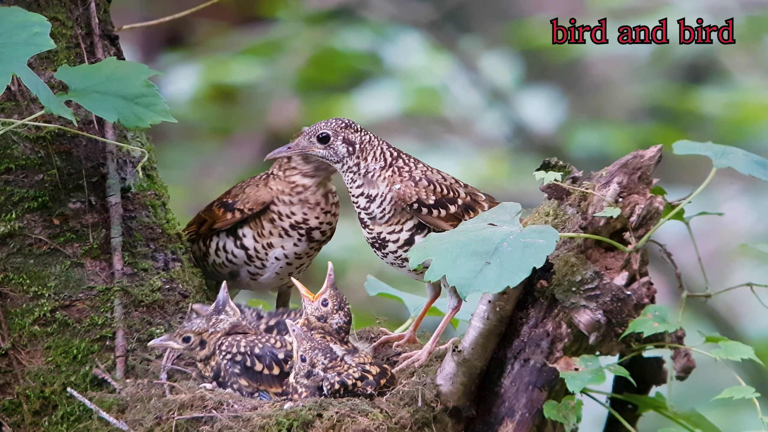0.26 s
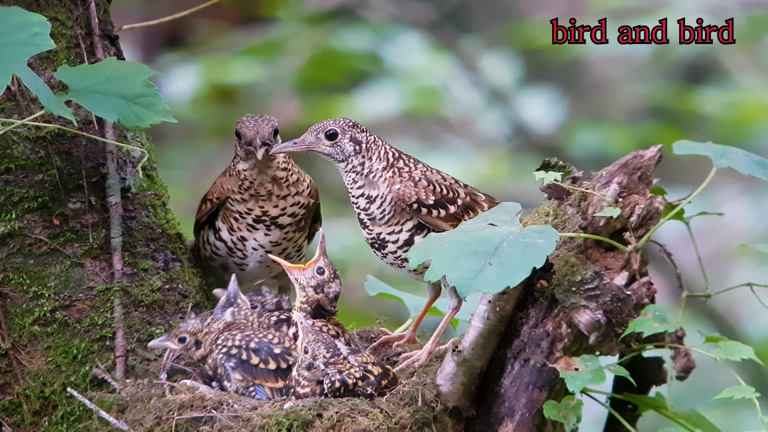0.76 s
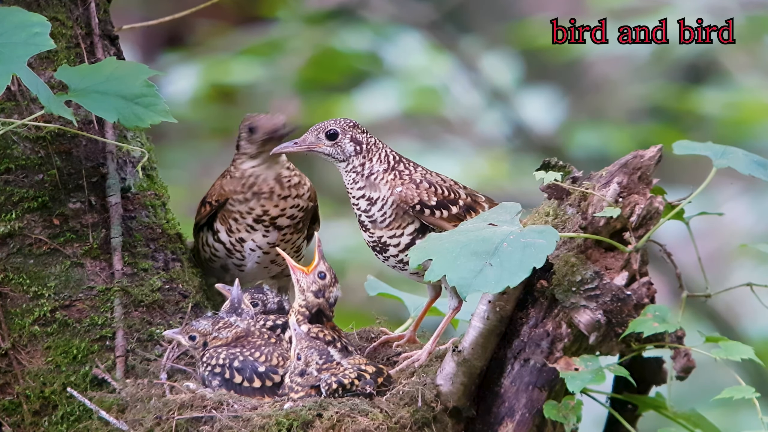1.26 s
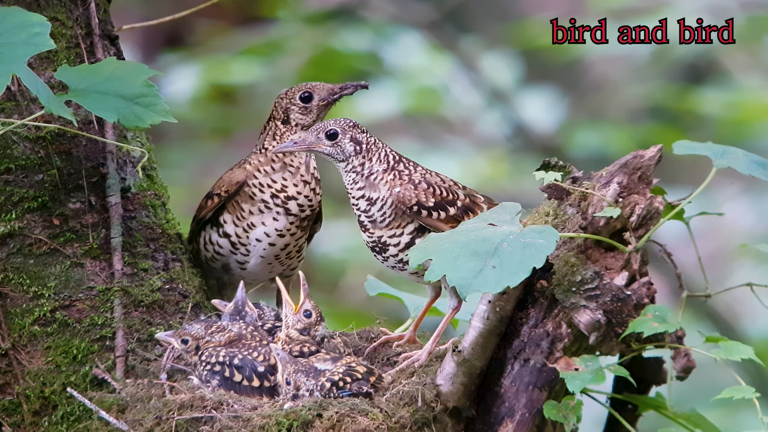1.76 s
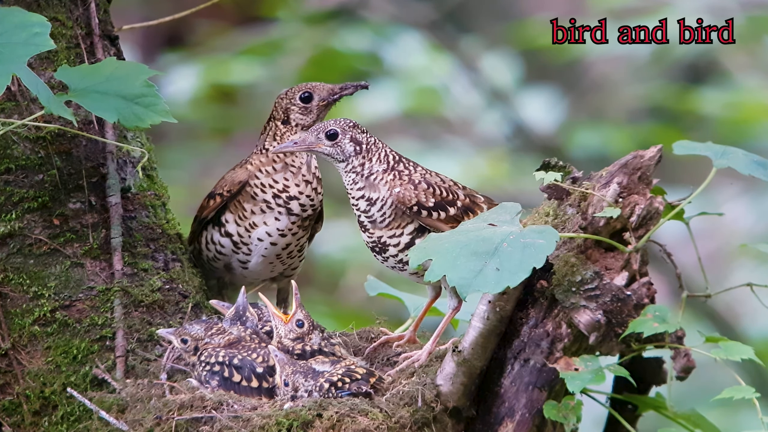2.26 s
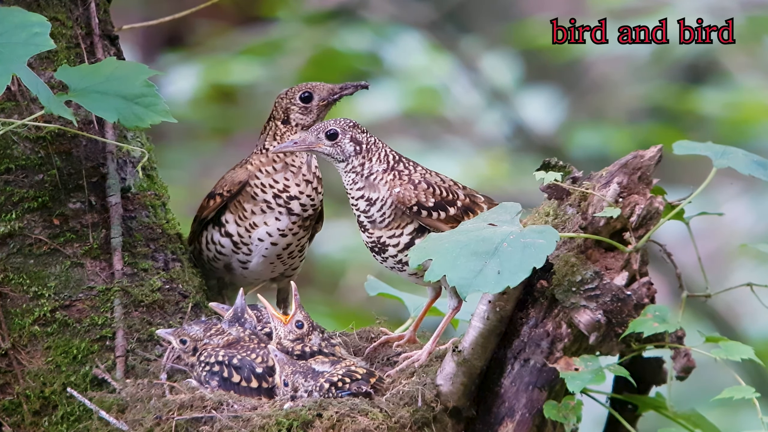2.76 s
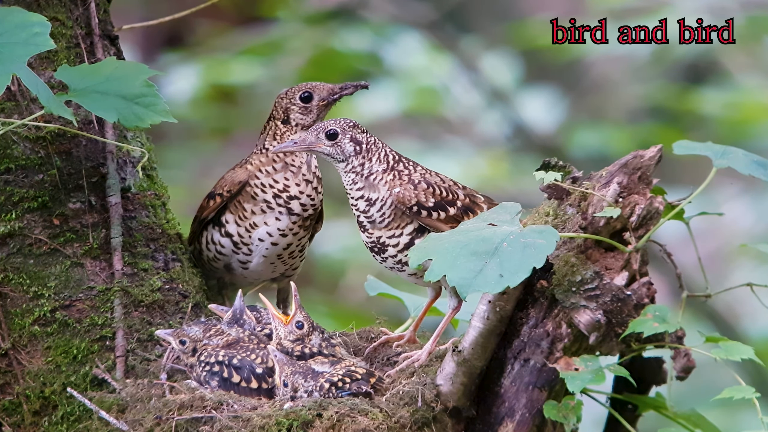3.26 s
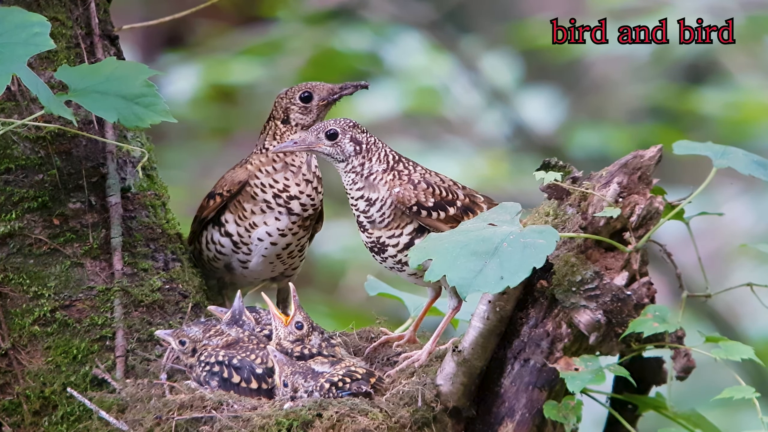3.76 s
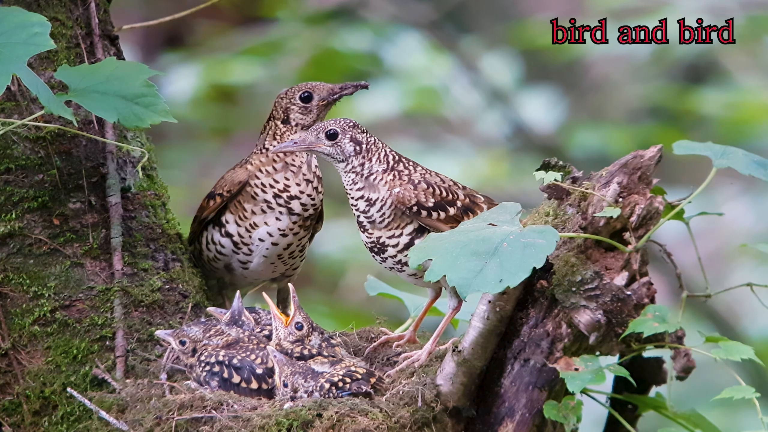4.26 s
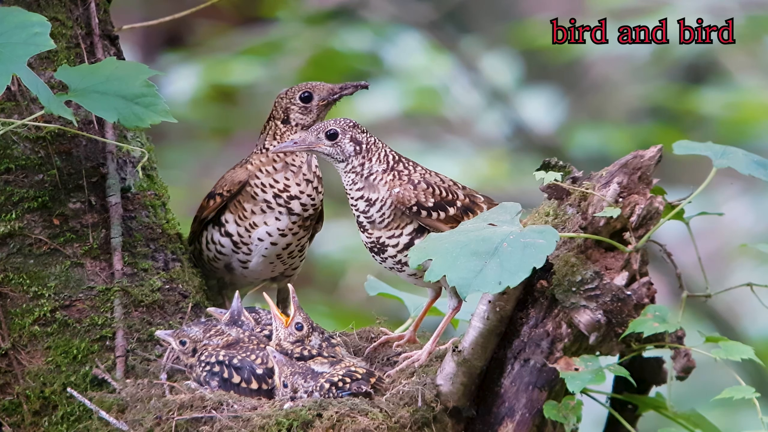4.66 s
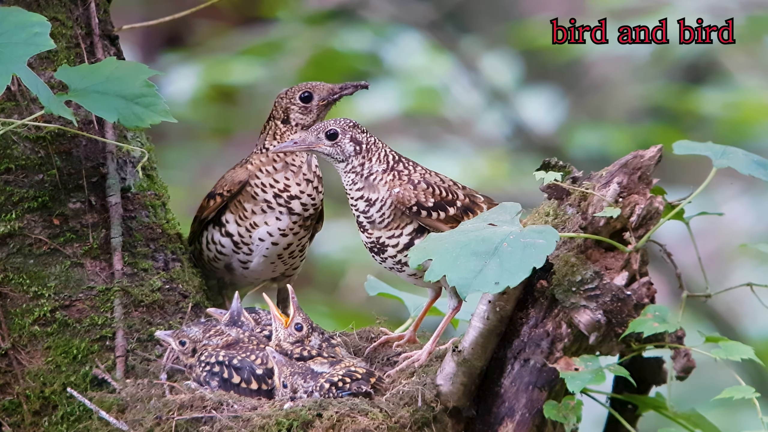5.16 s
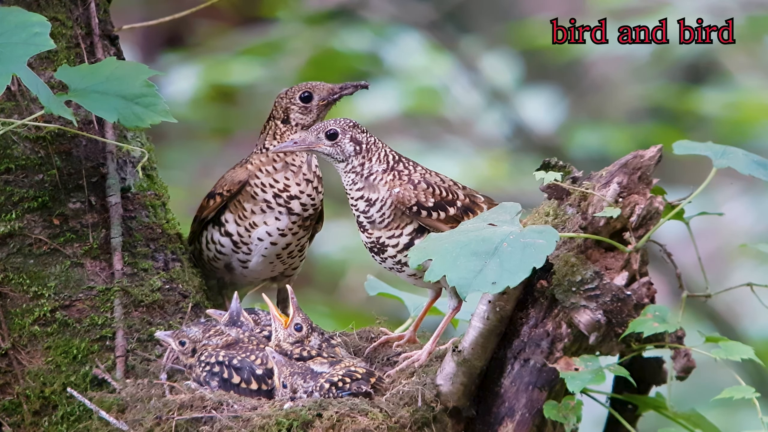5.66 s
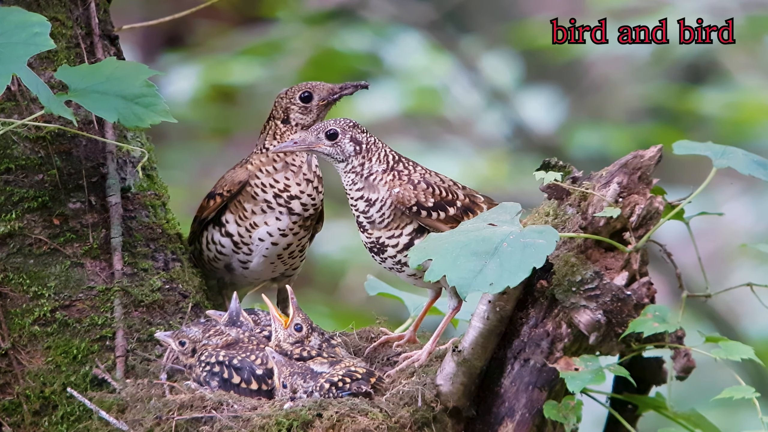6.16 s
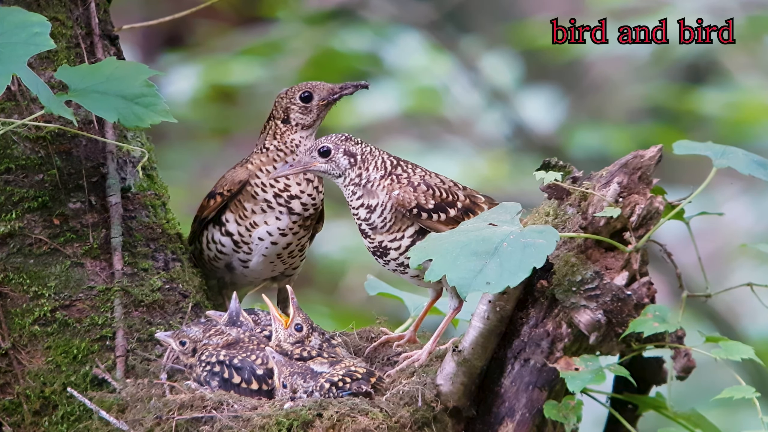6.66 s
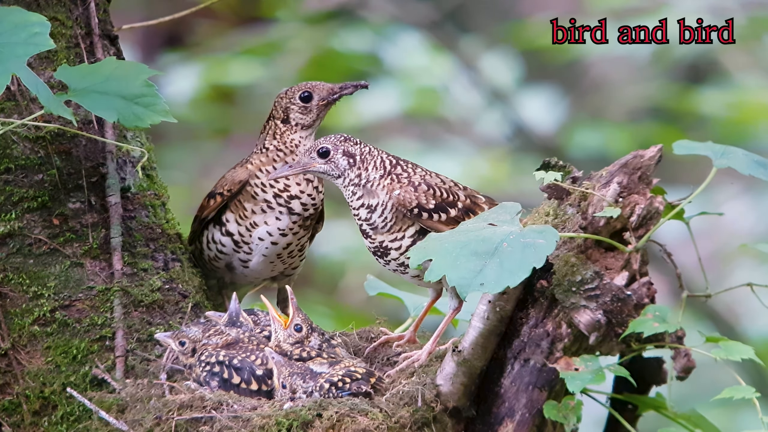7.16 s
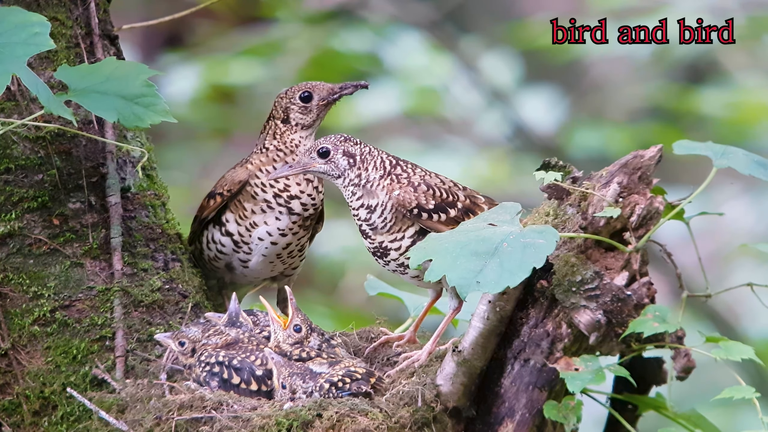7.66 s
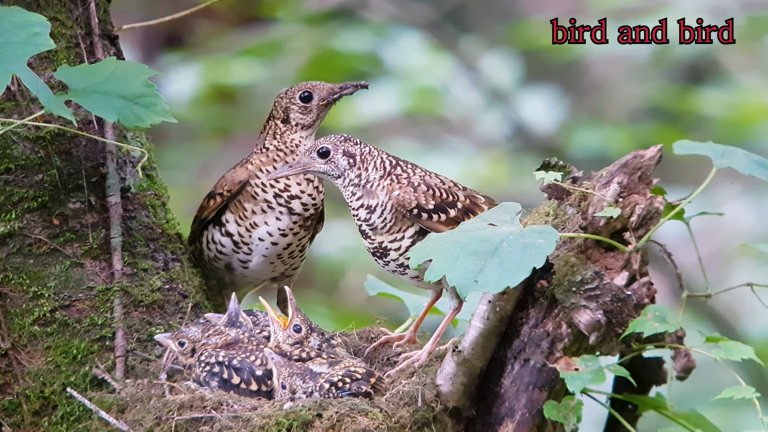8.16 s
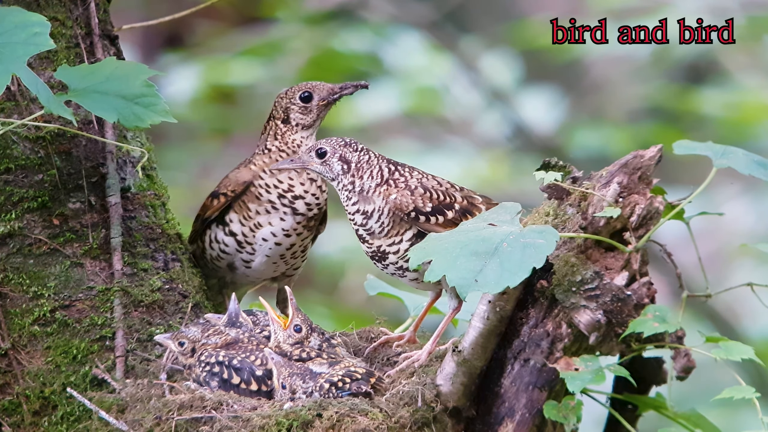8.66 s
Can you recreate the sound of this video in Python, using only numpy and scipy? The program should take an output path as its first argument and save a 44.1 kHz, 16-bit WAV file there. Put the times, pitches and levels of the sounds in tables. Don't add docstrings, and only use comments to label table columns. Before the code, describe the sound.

A quiet wide forest ambience: constant airy hiss, shimmering insects, and a raspy high cicada to the right that swells, cuts off sharply and returns. A pure, unbroken bird whistle of about half a second rings out with a lingering echo. Distant birds then exchange brief glides and burry chirps, with tiny rising calls. A second, marginally higher whistle follows, then the low-and-bright duet returns near the end.

```python
import sys
import numpy as np
from scipy import signal
from scipy.io import wavfile
from scipy.ndimage import uniform_filter1d

SR = 44100
rng = np.random.default_rng(int(sys.argv[2]) if len(sys.argv) > 2 else 0)


def file_out(sig):
    cols = np.atleast_2d(sig).T
    lim = np.clip(cols, -1, 1)
    pcm = np.round(lim * 32767).astype(np.int16)
    wavfile.write(sys.argv[1], SR, pcm)


def elevation(decibels):
    levels = np.asarray(decibels, float)
    return 10 ** (levels / 20)


N = 392490


def evened(x):
    return x / np.sqrt(np.mean(x ** 2) + 1e-20)


def read(points, hz):
    f, value = np.transpose(points)
    return np.interp(np.log(hz + 1), np.log(f + 1), value)


def curves(rows, t):
    s, *columns = np.transpose(rows)
    return [np.interp(t, s, c) for c in columns]


def panned(x, pan_db):
    side = np.array([elevation(pan_db / 2) * x, elevation(-pan_db / 2) * x])
    return side / np.sqrt((elevation(pan_db) + elevation(-pan_db)) / 2)


def add(mix, s, sound):
    part = mix[:, round(s * SR):][:, :sound.shape[1]]
    part += sound[:, :part.shape[1]]


def resonate(x, hz, width):
    turn = np.exp(2j * np.pi * np.cumsum(hz * np.ones(x.shape[-1])) / SR)
    r = np.exp(-np.pi * width / SR)
    return 2 * (turn * signal.lfilter([1 - r], [1, -r], x / turn)).real


def drift(top_hz, count):
    return evened(signal.lfilter(*signal.butter(2, 2 * top_hz / SR), rng.standard_normal(count)))


def trees(x, t60, delay):
    taps = np.zeros((2, 2 * SR))
    at = np.arange(0, 2 * SR - 40, 40) + rng.integers(0, 40, (2, (2 * SR - 1) // 40))
    np.put_along_axis(taps, at, rng.choice([-1., 1.], at.shape), 1)
    t = np.arange(2 * SR) / SR
    taps *= elevation(-60 * t / t60) * (1 - np.exp(-t / delay))
    return signal.fftconvolve(x, taps / np.linalg.norm(taps[0]), axes=1)[:, :N]


def thrush():
    # time in seconds, level in dB, pitch in Hz,
    # head turn as left minus right in dB.
    whistles = [
        [(1.44, -70, 2366, 0), (1.55, -52.5, 2311, -7), (1.61, -41, 2332, 7), (1.78, -34, 2357, 5.5),
         (1.83, -34.5, 2349, 5.5), (1.97, -41, 2330, 12), (2.025, -40, 2341, 1), (2.07, -40.5, 2340, 10),
         (2.095, -56, 2326, 6)],
        [(6.45, -69, 2480, 1), (6.5, -51, 2384, -4), (6.69, -40, 2378, -5), (6.735, -34, 2400, 0),
         (6.775, -36, 2402, -5), (6.85, -36.5, 2399, 4.5), (6.96, -38.5, 2410, 8), (7.035, -38, 2404, -2),
         (7.075, -57, 2386, -1)],
    ]
    # time in seconds, half width in seconds,
    # left depth 0-1, right depth 0-1.
    fades = [(1.535, .01, .5, .5), (1.648, 0.019, 0.3, 0.74), (1.7, 0.013, 0.98, 0.1),
             (1.722, 0.018, 0.77, 0), (1.806, 0.014, 0, 0), (1.864, 0.012, 1, 0.13),
             (1.935, 0.016, 0.74, 0.6), (1.997, 0.025, 0.05, 0.8), (2.045, 0.013, 0.35, 0.4),
             (6.528, 0.008, 0.38, 0.24), (6.715, 0.017, 0.63, 0.27), (6.755, 0.013, 0.6, 0.1),
             (6.81, 0.025, 0.35, 0), (6.865, .015, 0.1, 0.05), (7.005, 0.033, 0.33, 0.7)]
    # pitch in Hz, level in dB, t60 in seconds.
    slope_echo = [
        (2345, -58, 3.6),
        (2400, -58, 0.95),
    ]
    # time in seconds, half width in seconds, depth 0-1.
    echo_gaps = [(2.3, .03, .8), (2.44, 0.011, 0.8), (2.54, 0.017, 0.7), (2.68, 0.045, 0.8),
                 (7.095, .012, .7), (7.275, .02, .95), (7.33, .02, .8), (2.8, .07, .9)]
    t, dry = np.arange(N) / SR, np.zeros((2, N))
    for rows in whistles:
        db, hz, pan_db = curves(rows, t)
        sings = (t > rows[0][0]) & (t < rows[-1][0])
        swell = uniform_filter1d(panned(elevation(db) * sings, pan_db), size=500)
        smooth_hz = uniform_filter1d(hz, size=900)
        dry += np.sqrt(2) * swell * np.sin(2 * np.pi * np.cumsum(smooth_hz) / SR)
    for s, half, *depth in fades:
        dry *= 1 - np.clip(depth, 0, 1)[:, None] * np.exp(-((t - s) / half) ** 2)
    out = dry + elevation(-22.5) * trees(dry, t60=1.3, delay=0.08)
    for rows, (hz, db, t60) in zip(whistles, slope_echo):
        since = t - rows[-1][0]
        shimmer_db = 2 * np.array([drift(14, N), drift(14, N)])
        tail = elevation(db - 60 * since.clip(0) / t60 + shimmer_db) * np.clip(since / .03, 0, 1)
        out += tail * np.sin(2 * np.pi * np.cumsum(hz + 9 * drift(25.7, N)) / SR)
    for s, half, depth in echo_gaps:
        out *= 1 - np.clip(depth, 0, 1) * np.exp(-((t - s) / half) ** 2)
    return out


def far_birds():
    # start in seconds, length in seconds, first pitch in Hz,
    # last pitch in Hz, level in dB.
    warbler = [(2.57, .05, 2520, 2470, -63), (2.64, 0.074, 2540, 2680, -62.5),
               (2.735, 0.071, 2540, 2600, -64), (3.2, 0.11, 2180, 2230, -63),
               (4.885, 0.014, 2880, 2840, -60.5), (4.908, 0.014, 2680, 2610, -60),
               (4.95, 0.071, 2706, 2650, -55), (5.11, 0.17, 2294, 2042, -58),
               (5.435, 0.046, 2840, 2850, -55.5), (5.475, 0.033, 2750, 2580, -59),
               (5.515, 0.074, 2637, 2500, -53), (5.71, 0.029, 2320, 2190, -53),
               (5.738, .025, 2242, 2336, -49.5), (5.76, 0.028, 2265, 2200, -53),
               (5.82, 0.065, 2155, 2134, -52.5), (6.112, 0.024, 2900, 2900, -49.5),
               (6.138, 0.021, 2720, 2530, -52), (6.17, 0.052, 2604, 2517, -54),
               (6.23, 0.062, 2500, 2500, -57), (7.37, 0.07, 2400, 2200, -61.5),
               (7.56, 0.046, 2300, 2154, -63), (7.48, 0.084, 2204, 2400, -58.5),
               (7.46, 0.096, 1930, 1966, -66)]
    duet_low = [(3.37, 0.06, 2190, 2450, -57), (3.44, 0.046, 2370, 2380, -56),
                (3.53, 0.047, 2330, 2380, -55.5), (3.59, 0.08, 2260, 2320, -63.5),
                (3.86, 0.029, 2320, 2220, -52.5), (3.96, 0.02, 2170, 2390, -55),
                (4.01, 0.059, 2400, 2347, -57), (7.715, 0.044, 2244, 2490, -58.5),
                (7.79, 0.018, 2413, 2310, -52.5), (7.86, 0.04, 2460, 2330, -56),
                (7.93, 0.033, 2500, 2450, -53), (7.975, .07, 2480, 2420, -59.5),
                (8.13, 0.03, 2234, 2330, -59), (8.192, 0.036, 2330, 2290, -52.5),
                (8.295, 0.025, 2260, 2340, -58), (8.35, 0.038, 2345, 2310, -64)]
    duet_high = [(3.41, 0.034, 2760, 2920, -47), (3.558, 0.036, 3050, 2900, -50),
                 (3.825, 0.043, 2680, 2810, -50.5), (3.985, 0.033, 2960, 2893, -50.5),
                 (7.745, 0.049, 2840, 3010, -49), (7.88, 0.033, 3000, 3000, -58),
                 (7.9, 0.045, 2797, 2980, -50.5), (8.16, 0.042, 2850, 2833, -47.5),
                 (8.315, 0.039, 2820, 2945, -52)]
    piper = [(1.25, 0.18, 3460, 3790, -69), (1.875, .16, 3465, 3400, -55), (3.045, 0.053, 3200, 3360, -64),
             (3.98, .13, 3490, 3347, -54.5), (4.44, 0.062, 3460, 3690, -69), (5.96, 0.042, 3460, 3430, -53),
             (6.02, .02, 3400, 3400, -56), (6.05, .05, 3420, 3380, -56), (6.57, 0.093, 3300, 3340, -64.5),
             (8.86, .03, 3500, 3550, -67), (8.17, .06, 3154, 3170, -64)]
    piper_right = [(.92, 0.17, 3370, 3625, -66), (1.96, .038, 3770, 3700, -60),
                   (2.215, 0.03, 2890, 2880, -56), (2.24, 0.032, 2880, 3240, -52.5),
                   (2.31, 0.072, 3300, 3610, -67), (2.39, 0.057, 3560, 3580, -62.5),
                   (2.96, 0.035, 3500, 3350, -59.5), (2.99, 0.049, 3330, 3126, -50),
                   (3.31, 0.068, 3410, 3390, -65), (3.69, 0.03, 3520, 3520, -68),
                   (3.77, .04, 3470, 3480, -63), (3.93, 0.094, 3600, 3610, -60),
                   (4.5, 0.15, 3690, 3690, -59.5), (6.26, 0.11, 3530, 3500, -60),
                   (7.13, 0.025, 2800, 3420, -59), (7.155, .051, 3270, 2850, -52.5),
                   (7.905, 0.055, 3430, 3460, -51), (7.96, .07, 3400, 3400, -52.5),
                   (7.965, 0.044, 3670, 3750, -59), (8.04, .045, 3560, 3690, -60),
                   (8.29, .07, 3350, 3340, -64)]
    rises = [
        (.53, .016, 3950, 4700, -59),
        (4.755, .09, 3600, 4870, -53.5),
        (5.072, .06, 4350, 4880, -59),
        (5.675, .085, 4450, 5300, -59),
        (5.99, .12, 4750, 5900, -63),
        (6.4, .07, 4400, 5300, -62),
        (6.76, .07, 4900, 5550, -63),
        (7.055, .055, 4300, 5200, -59),
        (4.86, .12, 4830, 4800, -65),
    ]
    # start in seconds, length in seconds, centre in Hz,
    # width in Hz, level in dB.
    burrs = [(0.173, .14, 2380, 250, -58.5), (0.193, .11, 2880, 860, -57), (0.54, 0.22, 5760, 2500, -65.5),
             (1.204, 0.25, 3670, 450, -64.5), (1.84, 0.19, 2950, 630, -62), (3.135, .085, 2260, 330, -58),
             (3.878, 0.28, 3200, 1300, -58), (4.78, 0.15, 4300, 1000, -59.5),
             (5.502, 0.095, 2660, 490, -58.5), (5.72, 0.12, 5050, 920, -60),
             (5.94, 0.33, 3190, 1380, -56.5), (6.14, .14, 2540, 650, -60.5),
             (7.351, 0.28, 2270, 500, -62.5), (7.94, 0.18, 3350, 1200, -58),
             (7.677, 0.015, 6300, 6000, -55.5), (6.8, .018, 4660, 910, -61), (2.63, 0.17, 2640, 270, -62.5),
             (2.18, 0.12, 2830, 390, -61), (4.96, 0.095, 3460, 400, -62), (7, .14, 3520, 370, -67.5),
             (7.88, 0.077, 2920, 500, -55.5), (7.75, .05, 2880, 420, -57), (8.15, 0.28, 3080, 900, -63.5),
             (6.55, 0.29, 3300, 750, -65), (6.73, 0.18, 5060, 570, -64.5), (7.1, 0.13, 5350, 1100, -64),
             (0.894, .2, 3540, 450, -66.5), (7.2, .33, 3160, 820, -65), (7.53, .15, 3500, 350, -67),
             (5.42, .06, 3300, 350, -66), (6.15, .008, 4000, 3500, -60), (5.49, .13, 2860, 200, -66),
             (5.64, .13, 3420, 250, -68), (3.63, .2, 3450, 450, -65), (5.73, .17, 2250, 450, -64),
             (5.13, .15, 2180, 300, -66), (2.45, .14, 2600, 500, -66)]
    # notes, left minus right in dB, bend of the glide, hoarseness, fade over the note in dB.
    birds = [(warbler, -14, 0.998, 1.3, -2),
             (duet_low, -12, 1.02, 0.97, -3),
             (duet_high, 4.5, 4, 0.7, -2.5),
             (piper, 3.5, 1.01, 0.81, -1.5),
             (piper_right, -8.5, 1.01, 0.94, -1.4),
             (rises, 4.1, 2.2, 0.3, -1.5)]
    dry = np.zeros((2, N))
    waver, flutter, rasp = drift(57.0, N), drift(53, N), buckles(300, .3, 4.9)
    hoarse = drift(290, N)
    for notes, pan_db, bend, rough, fade_db in birds:
        for s, length, hz_a, hz_b, db in notes:
            u = np.linspace(0, 1, round(length * SR) + 300)
            at = slice(round(s * SR), round(s * SR) + len(u))
            hz = hz_b + (hz_a - hz_b) * (1 - u) ** bend
            hz *= 1 + .0105 * rough * waver[at]
            tone = np.sin(2 * np.pi * np.cumsum(hz) / SR) * signal.windows.tukey(len(u), .5)
            tone *= elevation(rough * (2.2 * flutter[at] + 2 * hoarse[at]))
            add(dry, s - .004, panned(tone * elevation(db + fade_db * (u - .5)), pan_db))
    for s, length, hz, width, db in burrs:
        piece = rasp[:, round(s * SR):round((s + length) * SR)]
        edges_hz = [hz - width / 2, hz + width / 2]
        band = signal.butter(3, edges_hz, "band", fs=SR, output="sos")
        burr = evened(signal.sosfilt(band, piece))
        add(dry, s, burr * panned(elevation(db) * signal.windows.tukey(piece.shape[1], .5), pan_db=-3))
    return dry + elevation(-4.5) * trees(dry, t60=.7, delay=.012)


def buckles(per_s, jitter, hiss):
    turns = np.cumsum(per_s * (1 + jitter * drift(90, N))) / SR
    clicks = np.diff(np.floor(turns), prepend=0) * elevation(1.8 * rng.standard_normal(N))
    return evened(clicks) + hiss * rng.standard_normal((2, N))


def cicada():
    # time in seconds, effort in dB, strain 0-1,
    # pitch of the middle band in Hz.
    bouts = [
        [(0, -60, 0.1, 10960), (.45, -62, 0.53, 11100), (.92, -56.5, 0.52, 11400), (1.08, -58, 0.37, 11450),
         (1.17, -62, 0.7, 10900), (1.58, -58, 1, 11000), (1.74, -64, 0.8, 11000), (2.3, -62.5, 0.44, 11050)],
        [(3.0, -63, 0.53, 10900), (3.3, -57.5, 0.4, 11270), (3.48, -55.5, 0.88, 11100), (3.7, -55, 0.96, 11150),
         (3.85, -65, 0.93, 11150), (4.1, -87, 0.2, 11000), (4.44, -75, .3, 11000), (4.71, -63, 0.5, 11000)],
        [(5.3, -65, 0.4, 11100), (5.47, -55, 0.76, 10950), (5.62, -53, 0.87, 11100), (5.8, -53.5, 0.65, 11300),
         (6.05, -66.5, 0.87, 11050), (6.5, -73, 0.85, 10900), (6.86, -70, .3, 11000)],
        [(7.2, -66.5, .5, 11050), (7.41, -56, 0.79, 11100), (7.6, -51.5, 0.74, 11200), (7.73, -53, 0.53, 11300),
         (7.79, -58.5, 0.84, 11100), (7.98, -60.5, 0.67, 11100), (8.25, -68.5, .4, 10900),
         (8.6, -68, 0.6, 11100), (8.9, -68, .5, 10900)],
    ]
    # start in seconds, level in dB.
    rasps = [(.345, -40), (1.782, -27), (1.86, -38), (2.05, -39), (2.31, -41), (3.879, -28.5), (3.935, -33),
             (3.975, -36), (5.8601, -33), (5.905, -38), (6.4288, -37), (7.8082, -28), (7.9, -38)]
    # centre in Hz, width in Hz, left minus right in dB.
    tymbal = [
        (8725, 800, -17),
        (11100, 1400, -5),
        (13850, 800, -14),
        (11000, 440, -6.5),
    ]
    t = np.arange(N) / SR
    effort_db, strain, second_hz = curves(sum(bouts, []), t)
    second_db = -4 + 8 * strain
    top_db = -30 + 20.5 * strain
    core_db = -21.5 + 16.5 * strain
    rise = second_hz / tymbal[1][0]
    shifts = (rise ** 0.55, rise, 1, rise)
    beat = np.sin(2 * np.pi * 11.6 * t)
    rasp_db = .7 * (top_db + 10) + 2.5
    throb_db = 2 * beat * np.clip(1.4 - t / 4, 0, 1) + 1.1 * drift(10, N)
    drive = buckles(290, .25, 6.4)
    plain = evened(drive)
    steadied_db = -strain * throb_db
    bands_db = (0, second_db + steadied_db, top_db + steadied_db, core_db + steadied_db)
    out = plain * panned(elevation(effort_db + rasp_db + throb_db), -14.5)
    for (hz, width, pan_db), db, shift in zip(tymbal, bands_db, shifts):
        band = resonate(resonate(drive, hz * shift, width), hz * shift, width)
        out += evened(band) * panned(elevation(effort_db + db + throb_db - 4.5), pan_db)
    hard = evened(out / elevation(effort_db)) + 1.5 * plain * panned(0.93, -11)[:, None]
    for s, db in rasps:
        out += hard * elevation(db - 30.5 - 60 * (t - s).clip(0) / 0.2) * (t > s)
    out = signal.sosfilt(signal.butter(10, [8100, 14300], "band", fs=SR, output="sos"), out)
    return out + elevation(-14.0) * trees(out, t60=0.43, delay=0.0027)


def far_cicada():
    # centre in Hz, width in Hz, level in dB.
    far_tymbal = [
        (8790, 660, -75),
        (11150, 700, -79),
    ]
    drive = buckles(290, 0.23, 8.)
    bands = [elevation(db) * evened(resonate(resonate(drive, hz, width), hz, width))
             for hz, width, db in far_tymbal]
    return sum(bands) * panned(elevation(1.2 * drift(6., N)), -10.0)


def chorus():
    # time in seconds, level in dB, centre in Hz.
    swells = [(0, -64.5, 5300), (.55, -61.5, 5420), (1.55, -59.5, 5280), (2.4, -62.5, 4910),
              (3.74, -57, 5600), (4.04, -68.5, 5100), (4.8, -60, 4850), (5.25, -60, 4880),
              (5.65, -56, 5600), (6.1, -57, 5460), (6.5, -61, 5300), (7.1, -62, 5000), (7.53, -54.5, 5720),
              (8.18, -64.5, 5270), (8.9, -63, 5180)]
    db, hz = curves(swells, np.arange(N) / SR)
    band = resonate(resonate(buckles(180, 0.26, 3.6), hz, 1300), hz, 1300)
    band = signal.sosfilt(signal.butter(12, 6050, fs=SR, output="sos"), band)
    return evened(band) * panned(elevation(db - 4.0 + 0.68 * drift(8.5, N)), pan_db=3.5)


def air():
    # frequency in Hz, level in dB per Hz.
    spectrum = [(18, -37), (30, -7), (55, -2), (103, -4.5), (324, -10), (710, -14.5), (997, -7.5),
                (2240, -2.5), (2490, 4), (3410, 4.5), (3990, -6.5), (5050, -2.5), (6060, -12.5),
                (7670, -12), (8970, -6.5), (13500, -17.5), (15500, -20.5)]
    # frequency in Hz, left-right likeness 0-1.
    likeness = [(60, 0.39), (130, 0.042), (290, 0.14), (640, 0.14), (1410, 0.77), (3100, 0.044),
                (6820, 0.15), (15000, 0.062)]
    # frequency in Hz, left minus right in dB.
    lean = [(60, 0), (200, 1), (2000, 2), (5000, -4.5), (8000, -19), (15000, -1.5)]
    # time in seconds, level in dB.
    haze = [(0.0, -67.5), (2.48, -64.5), (3.02, -65), (3.99, -68), (4.14, -64.5), (8.3, -70.5),
            (8.9, -63.5)]
    frames, hz = N // 256 + 5, np.fft.rfftfreq(1024, 1 / SR)
    a, b, c, d, patches = rng.standard_normal((frames, 513, 5)).T
    patches = evened(uniform_filter1d(uniform_filter1d(patches, size=10, axis=0), size=16, axis=1))
    same = np.clip(read(likeness, hz), -1, 1)[:, None]
    left = a + 1j * b
    z = np.array([left, same * left + np.sqrt(1 - same ** 2) * (c + 1j * d)])
    haze_db, = curves(haze, np.arange(frames) * 256 / SR)
    song_band = np.exp(-((hz - 2900) / 800) ** 4)[:, None]
    song_db = song_band * (0.86 * (haze_db + 60) + 0.89 * patches)
    air_db = read(spectrum, hz)
    z *= elevation(air_db[:, None] + song_db + 1.24 * patches)
    z *= panned(1, read(lean, hz))[:, :, None]
    z /= np.sqrt(np.mean(elevation(2 * air_db)) * 2)
    return elevation(-51) * signal.istft(z, nperseg=1024, noverlap=768)[1][:, :N] / 32


def scene():
    return thrush() + far_birds() + cicada() + chorus() + air() + far_cicada()


def low_pass(x):
    return signal.sosfilt(signal.butter(12, 15740, fs=SR, output="sos"), x)


def record(dry):
    heard = signal.sosfilt(signal.butter(4, 45, "high", fs=SR, output="sos"), dry)
    return low_pass(heard)


dry = scene()
out = record(dry)
file_out(out)
```